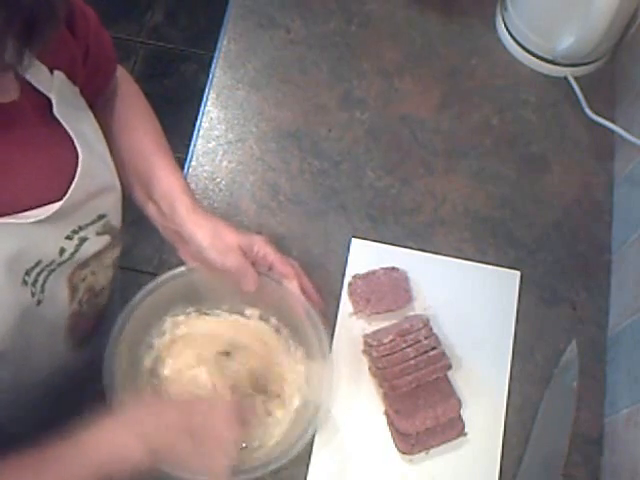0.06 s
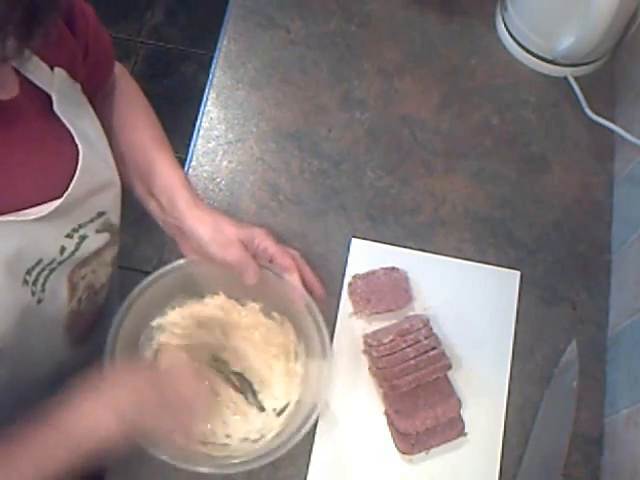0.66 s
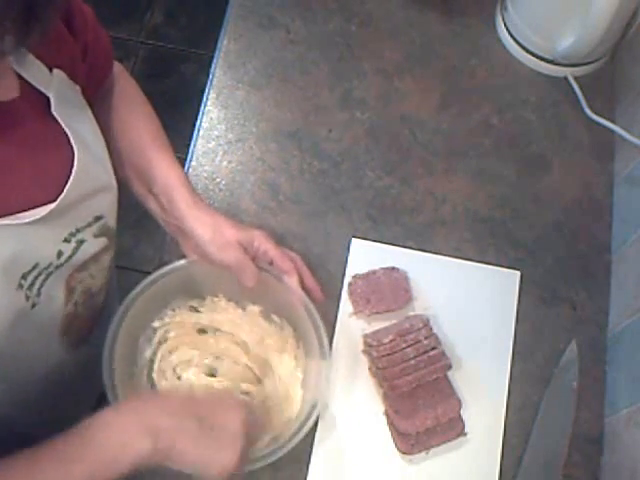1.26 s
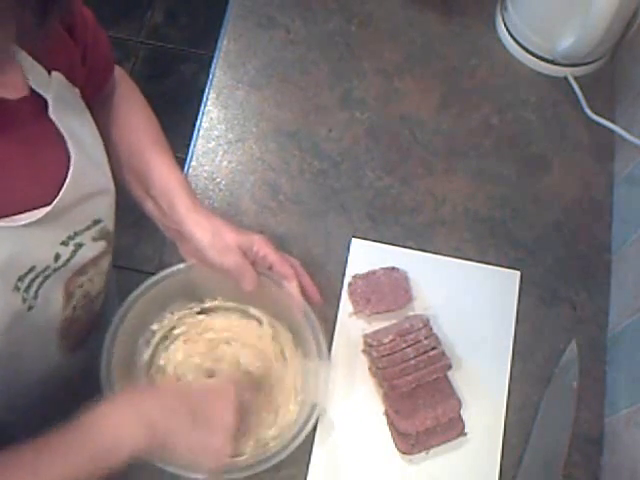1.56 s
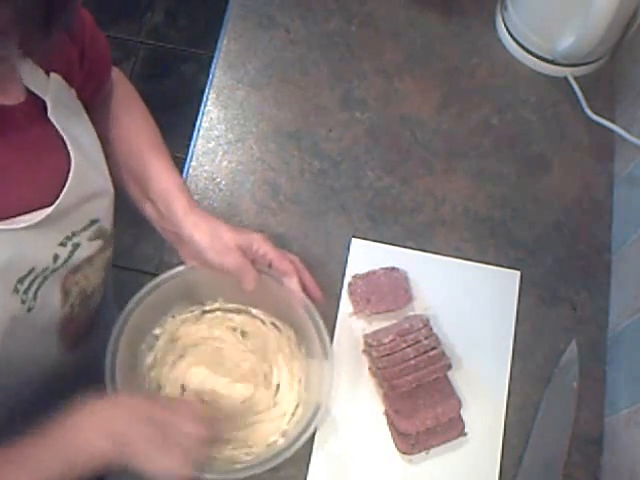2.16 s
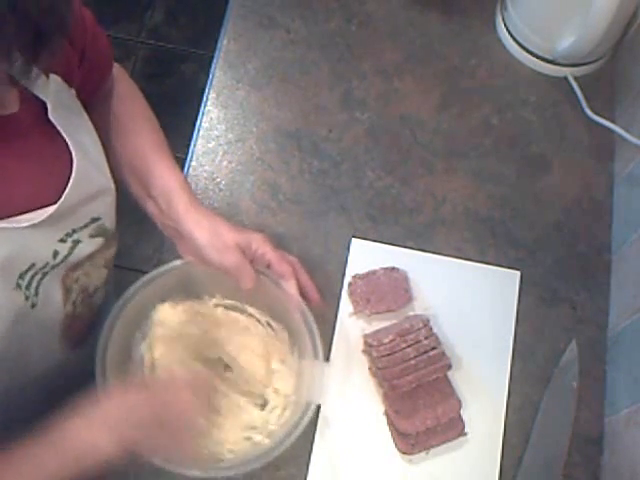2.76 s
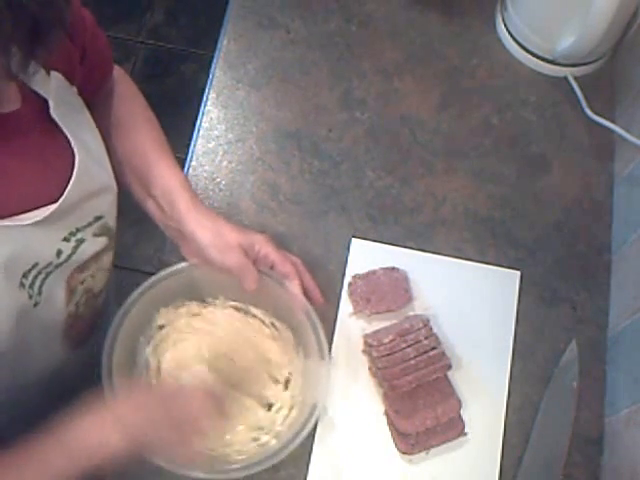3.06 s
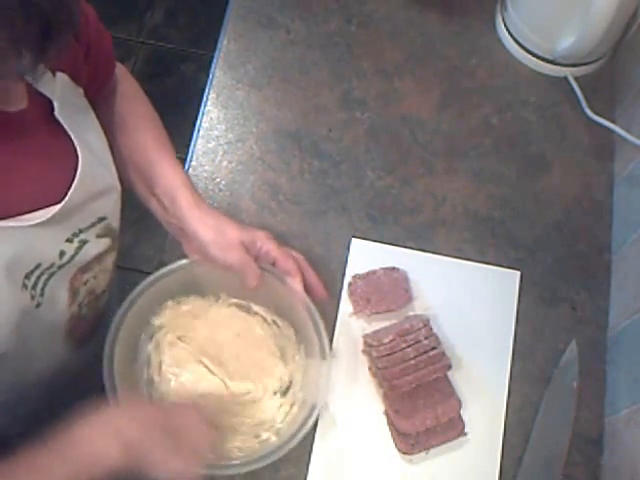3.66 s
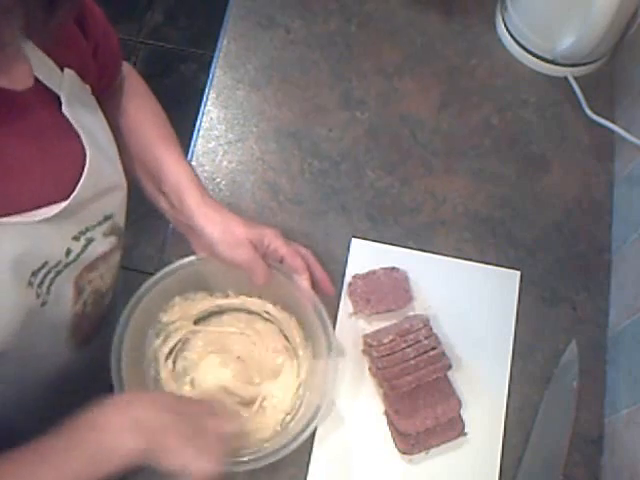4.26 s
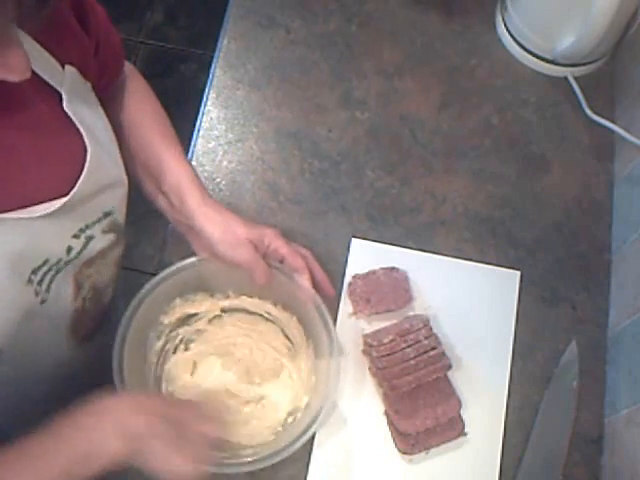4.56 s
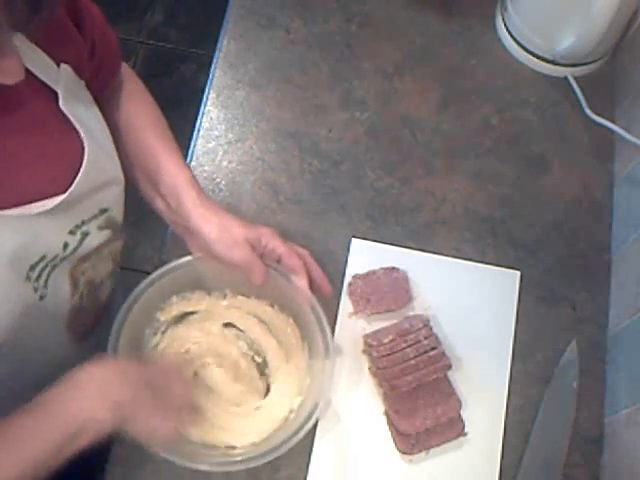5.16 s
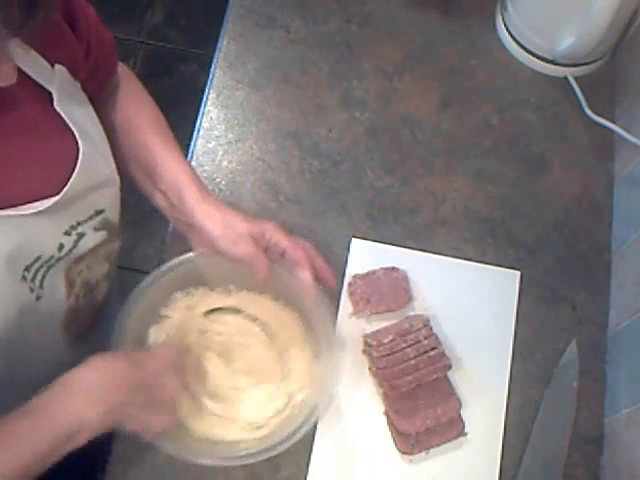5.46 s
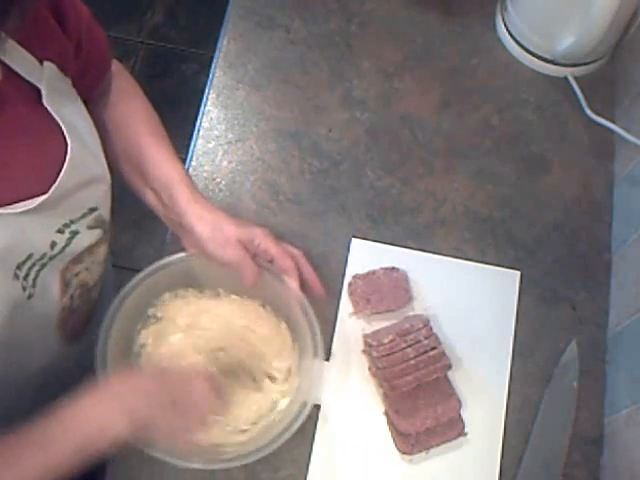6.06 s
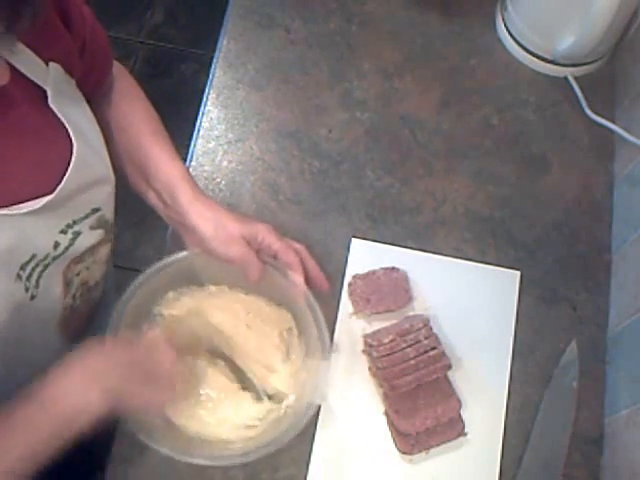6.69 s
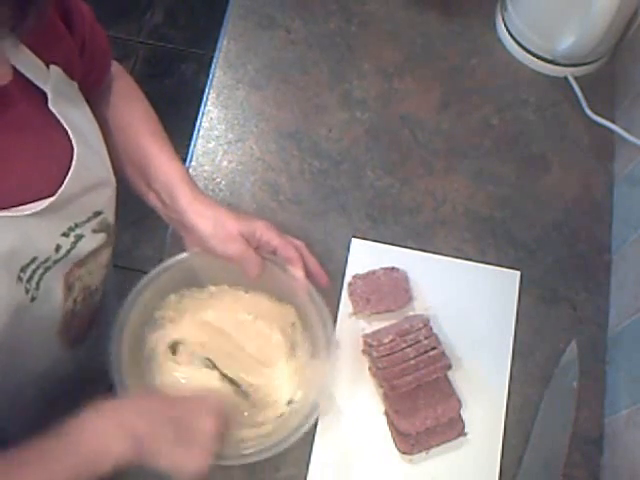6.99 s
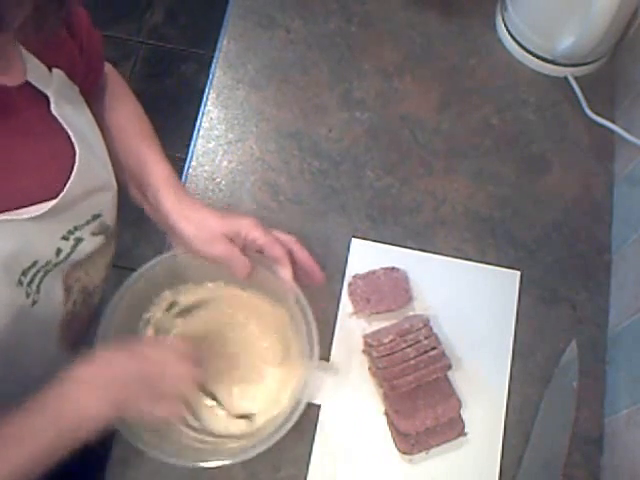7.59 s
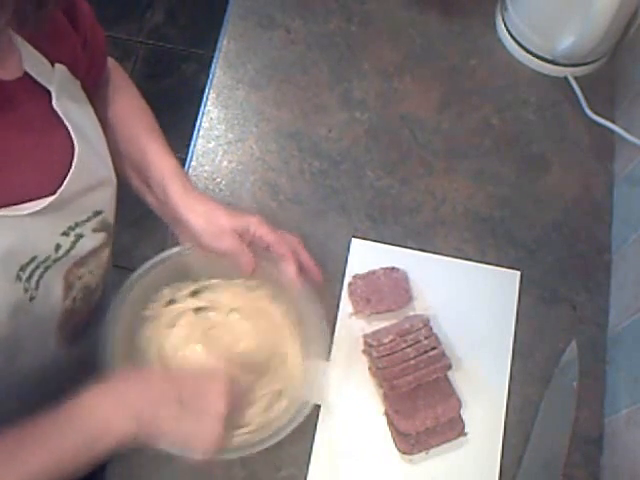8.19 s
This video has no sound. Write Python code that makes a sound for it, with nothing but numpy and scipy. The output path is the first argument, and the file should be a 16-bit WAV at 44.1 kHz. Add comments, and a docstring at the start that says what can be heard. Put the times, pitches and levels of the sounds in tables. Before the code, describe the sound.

A wire whisk beats thick batter in a glass bowl, close by in a small, slightly reverberant kitchen. For the first second or so, the wires clack against the glass about five times a second, each hit short and damped with a hollow knock. Quieter stirring follows, with wet squishes and fine crackles. At about 2.4 seconds the quick beating returns until 4 seconds, then gives way to soft stirring again, with one clack near 4.6 seconds. A third bout starts around 6 seconds and is loudest from 6.6 to 7.6, with sharper plops and spits of air from the batter. Gentle squelching continues until the end, just after 8 seconds. Throughout, the bowl bumps softly on the counter with a slight low rumble. A faint hiss lies underneath, joined by a faint low drone that grows over the last two seconds.

```python
"""A wire whisk beats thick batter in a hand-held glass bowl: three bouts of about five turns a second,
with slow stirring between. Each impact of the wires excites the damped modes of the wall and the hollow.
Air pockets resonate as they open (plops), and the dragged batter squishes, crackles and spits.
The bowl thuds on the kitchen counter with a wet slap, and the worktop rumbles in response.
A small hard room reverberates, over a faint hiss and a low drone that swells near the end."""
import sys
import numpy as np
from scipy import signal
from scipy.fft import rfft, irfft, next_fast_len
from scipy.io import wavfile
from scipy.ndimage import uniform_filter1d, map_coordinates

SR = 44100
rng = np.random.default_rng(int(sys.argv[2]) if len(sys.argv) > 2 else 0)


def digitize_waveform(pressure):
    """Quantize a signal to 16-bit integers and store it at the path in sys.argv[1].

    Rows of a 2-D input are taken as channels; values are limited to [-1, 1].
    """
    field = np.atleast_2d(pressure).T
    bounded = np.clip(field, -1, 1)
    quanta = np.round(bounded * 32767).astype(np.int16)
    wavfile.write(sys.argv[1], SR, quanta)


N = 367353
T = np.arange(SR // 2) / SR  # time within one event, s

# Levels in the tables are relative; each source adds its own gain.
# Spectra of room hiss and worktop rumble: frequency_hz, level_db
HISS_SPECTRUM = [(60, -19), (150, -23), (300, 2), (700, 3.5), (1500, -0.5), (3000, -13.5), (11000, -10)]
RUMBLE_SPECTRUM = [(15, -25), (30, 0), (44, 14.5), (62, 3.5), (100, 1), (200, -28), (600, -48)]
# Effort of the arm relative to ordinary beating: time_s, effort_db
ARM_EFFORT = [(0, 0.5), (1.2, -2), (1.42, -13.5), (2.25, -4.5), (2.42, -0.5), (3.1, 0), (3.8, 1.5),
              (4.5, -11), (5.7, 2.5), (5.85, -0.5), (6.5, 1), (6.85, 8.5), (7.25, 6), (7.55, -4.5),
              (8.33, -7)]
# Reverberation of the kitchen: frequency_hz, t60_s
ROOM_DECAY = [(150, 0.44), (700, 0.32), (1400, 0.25), (2300, 0.33), (11000, 0.65)]
# Wires strike the wall and whip back: start_s, level_db, pitch_hz, knock_gain_db, spot_hz, back_stroke_db
WIRE_IMPACTS = [(0.0237, -23.5, 2300, -21, 680, -51.5), (0.215, -23, 2170, -4, 610, -52),
                (0.423, -24.5, 2120, -13, 700, -48), (0.641, -13.5, 2140, -10, 830, -50),
                (0.868, -10.5, 2190, -12, 848, -47), (1.101, -19.5, 1510, -8.5, 710, -53),
                (2.375, -21, 1434, 0.5, 607, -103), (2.654, -15, 2130, -9.5, 706, -77),
                (2.749, -17.5, 1485, -10.5, 826, -55), (2.97, -21, 1385, -9.5, 920, -67),
                (3.162, -18, 2106, -10.5, 677, -68), (3.364, -14.5, 2085, -13.5, 860, -58),
                (3.567, -10.5, 2020, -12.5, 680, -74), (3.784, -19, 1410, -7, 885, -48.5),
                (3.881, -20, 2130, -13, 950, -77), (4.638, -16, 2220, -12.5, 867, -50.5),
                (5.939, -13, 2140, -11.5, 595, -66), (6.14, -19.5, 2110, -11, 604, -52),
                (6.581, -8.5, 2050, -14, 704, -59), (6.784, -10, 2490, -10.5, 674, -44),
                (6.9768, -5.5, 2079, -15.5, 940, -34.5), (7.171, -6, 1720, -14, 710, -37.5),
                (7.374, -4, 1997, -20.5, 714, -53), (7.601, -8.5, 1664, -23, 725, -45.5)]
# Modes of the glass wall, the bowl's hollow and its foot on the counter: frequency_hz, level_db, t60_s
WALL_MODES = [(1060, -17, 0.043), (1352, 3.5, 0.018), (1536, 8, 0.011), (1760, 6.5, 0.011),
              (2050, -4, 0.075), (2133, 2.5, 0.027), (2300, 1.5, 0.0097), (2474, 1.5, 0.023)]
HOLLOW_MODES = [(244, -12, 0.12), (595.5, 5, 0.033), (706.6, -4.5, 0.12), (820.5, -0.5, 0.057),
                (944, -4.5, 0.081)]
FOOT_MODES = [(127, -11.5, 0.084), (199, -8.5, 0.052), (250, -1.5, 0.12), (365, -0.5, 0.056),
              (448, -4.5, 0.093), (584, 7, 0.041), (711, -6, 0.14), (874, 12.5, 0.011)]
# The bowl bumps the counter: start_s, level_db, slap_gain_db
BOWL_BUMPS = [(0.029, -29, -23), (0.101, -35, -6), (0.296, -26, -13), (0.715, -28, -3), (0.943, -25, -4),
              (1.166, -31, -19), (1.49, -38.5, -16), (1.872, -38.5, 0), (2.084, -40.5, -17),
              (2.374, -22.5, -1.5), (2.602, -30, -7.5), (2.829, -30, -1.5), (2.972, -33.5, -21),
              (3.162, -33.5, -11), (3.365, -33, -15), (3.575, -34, -18), (4.156, -31, -7),
              (5.034, -39.5, -9), (5.306, -46, -18), (5.357, -36, -7), (5.594, -29, -1), (5.811, -30.5, -5),
              (5.94, -35, -4), (6.025, -27, -7), (6.213, -29.5, -5.5), (6.789, -26, -5), (7.013, -26, -3),
              (7.195, -27, -12)]
# Sweeps between beats, forcing air through a gap:
# middle_s, half_length_s, gap_hz, glide_octaves_per_half_length, gap_gain_db, squish_db, crackle_db
STIR_SWEEPS = [(0.375, 0.021, 1400, 0.06, -5, -57, -71), (0.453, 0.027, 2090, -0.031, 6, -40.5, -50.5),
               (1.266, 0.014, 1330, 0.024, 9, -44.5, -73), (1.448, 0.031, 1340, -0.0093, 2, -48.5, -56.5),
               (1.56, 0.043, 2270, .3, 2, -48.5, -49.5), (1.621, 0.024, 2190, -0.041, 1, -49.5, -52),
               (1.771, 0.017, 2400, -0.016, -9, -45.5, -47), (1.839, 0.051, 2080, -0.12, -3, -47.5, -49),
               (2.041, 0.055, 1360, 0.022, -1, -50.5, -54.5),
               (2.14, 0.039, 2390, -0.091, -10, -45.5, -53.5),
               (2.344, 0.06, 1340, 0.00048, -13, -48.5, -57), (2.402, 0.019, 1305, 0.012, 8, -35, -44),
               (2.587, 0.042, 1400, 0.073, -1, -54, -58.5), (4.023, 0.03, 2730, .3, -6.5, -48, -47),
               (4.185, 0.034, 2340, -.1, -19, -41.5, -47), (4.4, 0.045, 2050, .15, 0, -46, -52),
               (4.515, 0.032, 2320, 1, 2, -45, -48), (4.798, 0.096, 2250, -0.22, -2, -48, -52),
               (5.014, 0.035, 2490, -.07, -4, -45, -51.5), (5.093, 0.024, 2380, -.1, 2, -42, -51.5),
               (5.205, 0.038, 2390, .02, 5, -44, -48), (5.332, 0.013, 1340, 0.043, 1, -42.5, -43.5),
               (5.367, 0.014, 2320, 0.049, -5, -42, -54), (5.443, 0.023, 2340, -0.028, -1, -45.5, -58),
               (5.518, 0.025, 2430, 0, -10, -54, -55.5), (5.606, 0.019, 1206, 0.085, -2, -38, -44.5),
               (5.818, 0.039, 1356, .05, 7, -45.5, -55.5), (6.227, 0.027, 2370, -.1, 3, -52, -56),
               (6.383, 0.019, 2174, 0.15, -0.5, -41.5, -49), (6.469, 0.027, 2310, -0.065, -4, -42, -48),
               (7.912, 0.053, 2020, .2, -14, -44.5, -55), (7.981, 0.038, 1263, .1, -3, -42, -48.5),
               (8.14, 0.044, 1366, 0.088, 10, -48, -57), (8.237, 0.05, 1310, 0.21, -16, -43.5, -49.5)]
# Spectra of the wires' click and the batter's churn, squish and crackle: frequency_hz, level_db
CLICK_SPECTRUM = [(100, -11), (500, 3), (2500, 4.5), (3000, 2), (3800, -0.5), (4800, 1.5), (6500, -2.5),
                  (9500, 0.5), (11000, -9.5)]
CHURN_SPECTRUM = [(90, -12), (160, -20), (210, -10.5), (255, 0.5), (305, -9), (450, -6.5), (600, -0.5),
                  (700, -10), (850, -0.5), (1100, -17), (1800, -75.5)]
SQUISH_SPECTRUM = [(500, -44), (1000, -3), (1380, 7.5), (1750, -1), (2150, 3.5), (2500, 4.5), (2950, -6.5),
                   (4000, -16.5), (7000, -29)]
CRACKLE_SPECTRUM = [(1500, -18), (3200, 4.5), (5000, 4), (6500, 3), (9500, 4), (11000, -4.5)]
# The larger air pockets burst: start_s, level_db, pitch_hz
POCKET_BURSTS = [(0.122, -42, 1300), (0.336, -39.5, 2470), (0.555, -41.5, 1360), (0.781, -42, 1420),
                 (1.001, -32, 1370), (1.231, -36.5, 1270), (1.448, -42, 1350), (1.62, -45, 1370),
                 (1.719, -42.5, 2380), (1.782, -46, 1370), (1.932, -46.5, 1410), (1.97, -48, 1470),
                 (2.121, -44, 2400), (2.18, -49, 1390), (2.251, -44, 1400), (2.511, -41, 1550),
                 (2.866, -36, 1420), (3.059, -38, 1400), (3.262, -43, 1320), (3.466, -36, 1325),
                 (3.681, -31, 1320), (4.133, -48, 1510), (4.194, -37.5, 2274), (4.501, -49, 2470),
                 (4.701, -45, 2170), (5.102, -40.5, 1260), (5.138, -40, 1250), (5.354, -40, 1350),
                 (5.552, -45.5, 1320), (5.813, -40, 1380), (5.84, -23.5, 1370), (6.049, -32.5, 1330),
                 (6.358, -46.5, 1330), (6.472, -39.5, 1790), (6.485, -34, 1350), (6.685, -27.5, 1467),
                 (6.878, -20, 1360), (7.069, -17.5, 2480), (7.263, -21.5, 1420), (7.705, -43, 2300),
                 (7.812, -47, 1410), (8.237, -36.5, 1310)]
# Air spits from the batter: middle_s, half_length_s, level_db, pitch_hz, squeak_gain_db
AIR_JETS = [(0.124, 0.006, -46, 8500, -8), (0.321, 0.003, -46, 8000, -10), (0.537, 0.0092, -37, 8300, 3),
            (0.752, 0.012, -40.5, 7500, -7), (0.981, 0.0076, -35.5, 8460, -11),
            (1.218, 0.005, -44.5, 6000, -10), (2.963, 0.0018, -39.5, 9400, 2),
            (3.657, 0.0066, -35.5, 5400, 4), (3.868, 0.0075, -38, 9200, -3), (5.079, 0.015, -46, 6900, -8),
            (5.593, 0.0067, -40, 5430, -7), (6.254, 0.0063, -41.5, 8430, -2), (6.473, 0.003, -38, 8000, -7),
            (6.664, 0.011, -37.5, 7670, 0), (6.864, 0.0073, -31.5, 8400, -7), (7.063, 0.006, -36, 9050, 2),
            (7.255, 0.0057, -29, 5000, -8)]
# Swell of the low drone: time_s, level_db
DRONE_LEVELS = [(5.9, -69), (6.4, -66), (7.1, -62), (8.33, -58)]

TOP_HZ = 11200  # upper band limit
# Reference levels from which each kind of event's click, spray, squish and churn are scaled
BEAT_DB, BACK_DB, STIR_DB, POCKET_DB = -14.5, -44.5, -35.5, -38.5
# Level relative to the parent event; dB less per dB of that event; dB more per dB of effort
CLICK_DB, CLICK_FALL, CLICK_GROWS = -20, 0.04, 0.2
WAKE_DB, WAKE_FALL, WAKE_GROWS = -5, 0.92, 0.98
SPRAY_DB, SPRAY_FALL, SPRAY_GROWS = -7, 0.56, 0.4
SMACK_DB, SMACK_FALL = -4, 0.1


def amp(db):
    """Decibels as an amplitude ratio."""
    return 10 ** (np.asarray(db) / 20)


def unit(x):
    """Normalisation to rms 1."""
    return x / np.sqrt(np.mean(x ** 2) + 1e-20)


def punch(x):
    """Normalisation of the loudest 6 ms to rms 1."""
    return x / np.sqrt(np.max(uniform_filter1d(x ** 2, size=265)))


def along(points, hz):
    """Interpolation of (frequency_hz, value) points on a logarithmic frequency axis."""
    frequencies, values = np.transpose(points)
    return np.interp(np.log(hz + 1), np.log(frequencies), values)


def add(track, s, sound):
    """Superposition of a sound on the track at time s."""
    part = track[max(round(s * SR), 0):][:len(sound)]
    part += sound[:len(part)]


def effort(s):
    """The arm's effort in dB, interpolated at time s."""
    return np.interp(s, *np.transpose(ARM_EFFORT))


def colour(x, spectrum):
    """Spectral shaping of x, at rms 1."""
    size = next_fast_len(len(x) + SR // 8)
    gain = amp(along(spectrum, np.fft.rfftfreq(size, 1 / SR)))
    return unit(irfft(rfft(x, size) * gain, size)[:len(x)])


def sparks(spread_db):
    """Heavy-tailed noise: the wider the spread of sample sizes, the more it snaps."""
    return rng.standard_normal(len(T)) * amp(spread_db * np.clip(rng.standard_normal(len(T)), -2.5, 2.5))


def onset(rise_s):
    """A smooth attack from 0 to 1."""
    return 1 - np.exp(-(T / rise_s) ** 2)


def swell(rise_s, t60_s):
    """Exponential decay after a smooth attack."""
    return onset(rise_s) * amp(-60 * T / t60_s)


def waver(rate_hz):
    """Smooth random modulation between about -1.5 and 1.5."""
    knots = rng.uniform(-1.5, 1.5, int(len(T) * rate_hz / SR) + 4)
    return map_coordinates(knots, [T * rate_hz])


def clumps(rate_hz, depth_db):
    """Random amplitude modulation, at rms 1."""
    return unit(amp(depth_db * waver(rate_hz)))


def narrow(hz, width_hz):
    """Quadrature modulation: a noise band reaching width_hz to each side of the moving centre hz."""
    lowpass = signal.butter(2, width_hz, fs=SR, output="sos")
    in_phase, quadrature = signal.sosfilt(lowpass, rng.standard_normal((2, len(hz))))
    phase = 2 * np.pi * np.cumsum(hz) / SR
    return unit(in_phase * np.cos(phase) + quadrature * np.sin(phase))


def chirp(hz, bend, settle_s):
    """Exponential relaxation of pitch: a tone starts a share bend away from hz and settles on it."""
    return np.sin(2 * np.pi * hz * np.cumsum(1 + bend * np.exp(-T / settle_s)) / SR)


def ring(modes, rise_s, detune, sag=0, vary_db=2.0, sag_s=0.0406):
    """Damped free vibration: moving batter detunes the modes, and its load lowers them by a share sag."""
    hz, db, t60_s = np.transpose(modes)[:, :, None]
    size, shift, phase = rng.standard_normal((3, len(modes), 1))
    clock = np.cumsum(1 - sag * (1 - np.exp(-T / sag_s))) / SR
    decays = amp(db + vary_db * size - 60 * T / t60_s)
    waves = np.sin(2 * np.pi * (hz * (1 + detune * shift) * clock + phase))
    return punch((decays * waves).sum(0) * onset(rise_s))


def room(x, wet_db):
    """Reverberation: direct sound plus a diffuse tail, different for each position of the whisk."""
    hz, t, noise = signal.stft(rng.standard_normal(len(T)), SR, nperseg=256)
    decay = amp(-60 * t / along(ROOM_DECAY, hz)[:, None])
    tail = signal.istft(noise * decay, SR, nperseg=256)[1][:len(T)]
    answer = signal.fftconvolve(x, tail * onset(0.00057))[:len(x)]
    return x + amp(wet_db) * np.std(x) * unit(answer)


def spatter(envelope, spectrum, spread_db, wet_db, tint_db=6.5):
    """Scattering: the room diffuses a burst of snaps, tinted by chance resonances, into a fading hiss."""
    hz = np.linspace(100, TOP_HZ, 36)
    tinted_db = along(spectrum, hz) + tint_db * rng.uniform(-1.17, 1, len(hz))
    snaps = colour(sparks(spread_db), np.transpose([hz, tinted_db])) * envelope
    energy = np.abs(signal.fftconvolve(envelope ** 2, swell(0.00068, 0.31) ** 2)[:len(T)])
    hiss = unit(colour(sparks(spread_db=3.5), spectrum) * np.sqrt(energy))
    return snaps + amp(wet_db) * np.sqrt(np.mean(envelope ** 2)) * hiss


def room_hiss():
    """Stationary broadband noise: the faint floor of the room."""
    return amp(-56.0) * colour(rng.standard_normal(N), HISS_SPECTRUM)


def counter_rumble():
    """Forced vibration: the arm and the bowl's bumps shake the worktop, and their powers add."""
    sway = np.zeros(N)
    for s, db, _ in BOWL_BUMPS:
        add(sway, s, amp(db - 18.5) * swell(rise_s=0.044, t60_s=0.46))
    tremble = amp(-60.5 + 0.52 * effort(np.arange(N) / SR))
    return np.hypot(tremble, sway) * colour(rng.standard_normal(N), RUMBLE_SPECTRUM)


def wire_landings(gap_s=0.0024, loss_db=2):
    """Repeated excitation: three wires land in turn, each ringing the wall more softly."""
    out = np.zeros(len(T))
    for k, late in enumerate(rng.random(size=3)):
        wall = ring(WALL_MODES, rise_s=0.0011, detune=0.031, sag=0.121)
        add(out, gap_s * k * (1 + (late - .5) / 2), amp(-loss_db * k) * wall)
    return punch(out)


def hollow(spot_hz, boost_db=9.5, width_hz=60):
    """Selective excitation: the hollow's modes near the pitch of the struck spot ring more strongly."""
    return [(hz, db + boost_db * np.exp(-((hz - spot_hz) / width_hz) ** 2), t60_s)
            for hz, db, t60_s in HOLLOW_MODES]


def wire_clacks():
    """Impact excitation: the wires click, the damped wall rings and the bowl's hollow knocks."""
    out = np.zeros(N)
    for s, db, hz, knock_db, spot_hz, _ in WIRE_IMPACTS:
        click_db = CLICK_DB - CLICK_FALL * (db - BEAT_DB) + CLICK_GROWS * effort(s)
        # the pitch falls as batter loads the wall
        slap = punch(chirp(hz, bend=0.16, settle_s=0.0011) * swell(0.002, 0.017))
        wall = punch(slap + wire_landings())
        knock = ring(hollow(spot_hz), rise_s=0.00069, detune=0.023)
        click = punch(spatter(swell(0.0032, 0.044), CLICK_SPECTRUM, spread_db=9.5, wet_db=-0.3))
        add(out, s - .0007, amp(db - 11.5) * room(wall, wet_db=-4.0))
        add(out, s, amp(db + knock_db - 6.5) * room(knock, wet_db=1.5))
        add(out, s - .003, amp(db + click_db + 2.5) * click)
    return out


def smack(rise_s, t60_s):
    """A noise transient: wet batter parts with a short, spiky squish."""
    return punch(colour(sparks(spread_db=5.5), SQUISH_SPECTRUM) * swell(rise_s, t60_s))


def bowl_thuds():
    """Impact excitation of low modes: the rocking bowl's foot hits the counter as batter slaps inside."""
    out = np.zeros(N)
    for s, db, slap_db in BOWL_BUMPS:
        bump = ring(FOOT_MODES, rise_s=0.002, detune=0.029, vary_db=0.5)
        slap = amp(slap_db) * smack(rise_s=0.00091, t60_s=0.039)
        add(out, s, amp(db - 5.0) * room(bump + slap, wet_db=-0.5))
    return out


def strokes(back_delay_s=0.11, back_half_s=0.029, back_gap_hz=2214, back_octaves=0.07, back_gap_db=-27):
    """The driving motion, back strokes and then sweeps: the columns of STIR_SWEEPS plus churn_db."""
    for s, *_, back_db in WIRE_IMPACTS:
        haste = amp(-0.34 * max(effort(s), 0))  # hard beating returns sooner and faster
        more_db = 0.32 * (back_db - BACK_DB)
        yield (s + back_delay_s * haste, back_half_s * haste, back_gap_hz, back_octaves, back_gap_db,
               -45.5 + more_db, back_db, -48 + more_db)
    for s, half_s, hz, octaves, gap_db, squish_db, crackle_db in STIR_SWEEPS:
        churn_db = squish_db - 3.5 + 0.58 * (squish_db - STIR_DB)  # a deeper sweep churns more
        yield s, half_s, hz, octaves, gap_db, squish_db, crackle_db, churn_db


def squelches(low_hz=1208, high_hz=2708, per_s=70, spread_db=6):
    """Cavity resonance: small air pockets open in a run, each a bending chirp of its own pitch."""
    out = np.zeros(len(T))
    life = T[:SR // 40]
    envelope = swell(0.0025, 0.022)[:len(life)]
    for k, (when, pitch, bend, size) in enumerate(rng.random((int(per_s * T[-1]), 4))):
        glide = 1 + 0.3 * (bend - .5) * (1 - np.exp(-life / 0.0055))
        hz = low_hz * (high_hz / low_hz) ** pitch * glide
        tone = np.sin(2 * np.pi * np.cumsum(hz) / SR)
        add(out, (k + when) / per_s, amp(spread_db * (2 * size - 1)) * envelope * tone)
    return unit(out)


def batter_swishes(lead_s=0.2):
    """Flow noise: dragged wires churn the paste, squeeze air through a resonant gap and snap threads."""
    out = np.zeros(N)
    for s, half_s, hz, octaves, gap_db, squish_db, crackle_db, churn_db in strokes():
        start = max(s - lead_s, 0)
        progress = (start + T - s) / half_s
        stroke = np.exp(-.5 * np.abs(progress) ** 2.4)  # slightly squarer than a bell curve
        glide = 2 ** (octaves * np.clip(progress, -2, 2)) * (1 + 0.0403 * waver(rate_hz=50))
        paste = colour(sparks(spread_db=0.0), SQUISH_SPECTRUM) * clumps(rate_hz=70.6, depth_db=8.0)
        air = narrow(hz * glide, width_hz=190) * clumps(rate_hz=68.8, depth_db=11.0)
        squish = amp(squish_db - 0.47) * unit(paste + amp(gap_db) * air + amp(-3) * squelches())
        churn = amp(churn_db) * colour(rng.standard_normal(len(T)), CHURN_SPECTRUM)
        snapping = stroke * clumps(rate_hz=180, depth_db=5.0)
        threads = spatter(snapping, CRACKLE_SPECTRUM, spread_db=8.0, wet_db=-1.5)
        add(out, start, room(stroke * (squish + churn), wet_db=-2.5) + amp(crackle_db) * threads)
    return out


def pocket_plops():
    """Cavity resonance: an opening air pocket sings, smacks, throws spray and wakes the bowl's hollow."""
    out = np.zeros(N)
    for s, db, hz in POCKET_BURSTS:
        excess_db = db - POCKET_DB
        wake_db = WAKE_DB - WAKE_FALL * max(excess_db, 0) + WAKE_GROWS * effort(s)
        spray_db = SPRAY_DB - SPRAY_FALL * excess_db + SPRAY_GROWS * effort(s)
        bend = -0.046 + 0.19 * rng.standard_normal()
        pocket = punch(chirp(hz, bend, settle_s=0.0013) * swell(0.0015, 0.018))
        parting = amp(SMACK_DB - SMACK_FALL * excess_db) * smack(rise_s=0.002, t60_s=0.064)
        spray = punch(spatter(swell(0.00053, 0.089), CRACKLE_SPECTRUM, spread_db=-1.5, wet_db=-3.0))
        add(out, s, amp(db + 1.5) * room(pocket + parting, wet_db=-11.0))
        add(out, s, amp(db + spray_db) * spray)
        wake = ring(hollow(spot_hz=648), rise_s=0.0013, detune=0.038)
        add(out, s, amp(db + wake_db + 4.0) * room(wake, wet_db=4.5))
    return out


def air_squirts(lead_s=0.05):
    """Jet noise: air forced through a closing slit in the batter spits, with a short falling squeak."""
    out = np.zeros(N)
    for s, half_s, db, hz, squeak_db in AIR_JETS:
        progress = (T - lead_s) / half_s
        burst = np.exp(-.5 * progress ** 2)
        glide = 2 ** (-0.06 * np.clip(progress, -2, 2))
        squeak = punch(burst * narrow(hz * glide, width_hz=0.075 * hz))
        spit = punch(spatter(burst, CRACKLE_SPECTRUM, spread_db=-1.0, wet_db=-7.5))
        add(out, s - lead_s, amp(db) * punch(spit + amp(squeak_db) * room(squeak, wet_db=-11.0)))
    return out


def low_drone(pitch_hz=152):
    """Narrow-band noise, heard as a low drone that rises out of the hiss near the end."""
    level_db = np.interp(np.arange(N) / SR, *np.transpose(DRONE_LEVELS))
    return amp(level_db) * narrow(np.full(N, pitch_hz), width_hz=18.0)


def scene():
    """Linear superposition of all sources in one channel."""
    whisking = wire_clacks() + pocket_plops() + bowl_thuds() + batter_swishes() + air_squirts()
    return (whisking + counter_rumble() + room_hiss() + low_drone())[None]


def record(dry):
    """Band limiting: a steep low-pass filter removes the treble above TOP_HZ."""
    return signal.sosfilt(signal.ellip(12, .1, 80, TOP_HZ, fs=SR, output="sos"), dry)


dry = scene()
out = record(dry)
digitize_waveform(out)
```